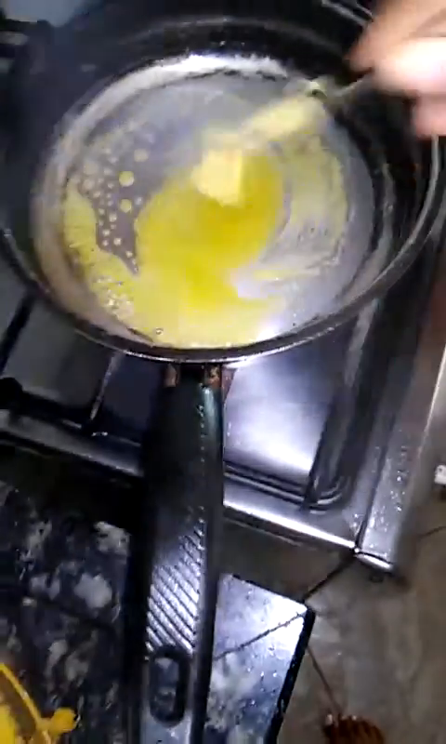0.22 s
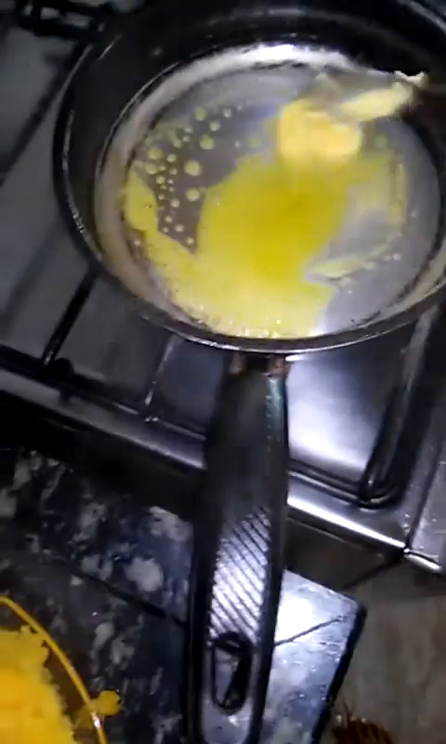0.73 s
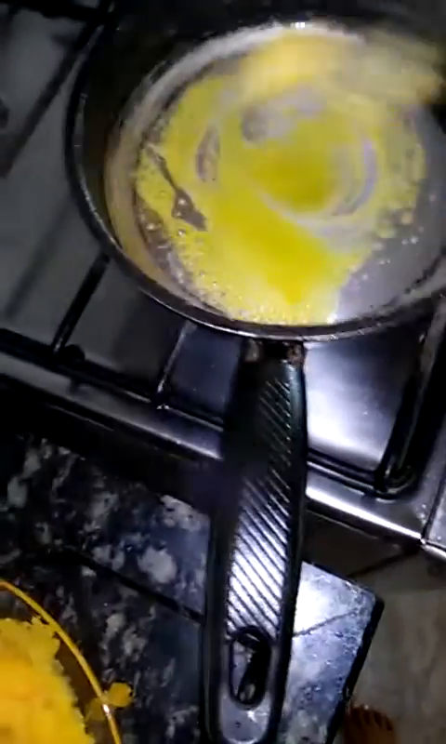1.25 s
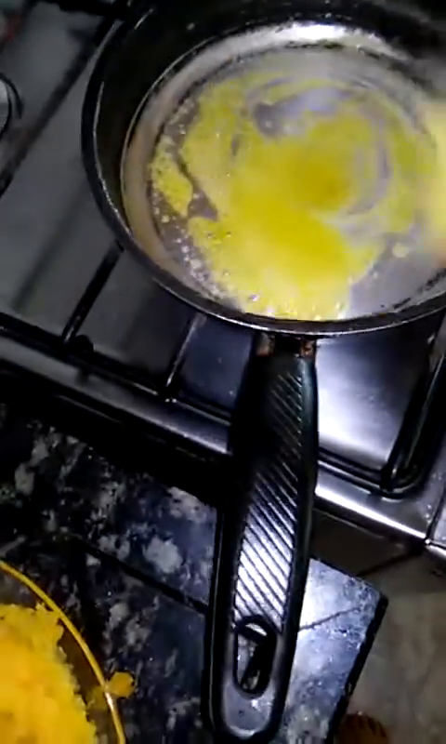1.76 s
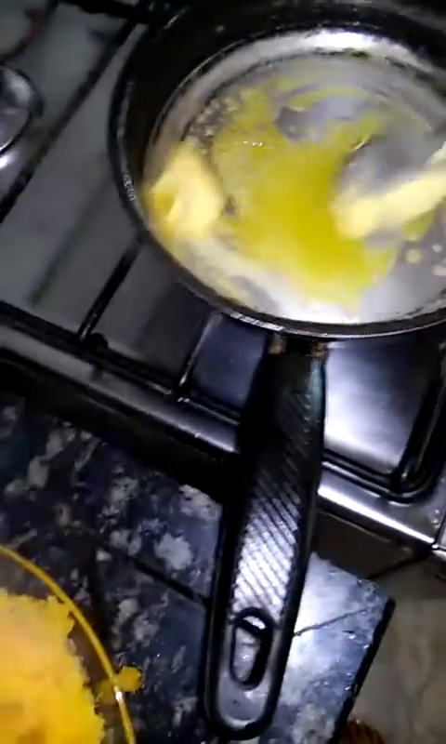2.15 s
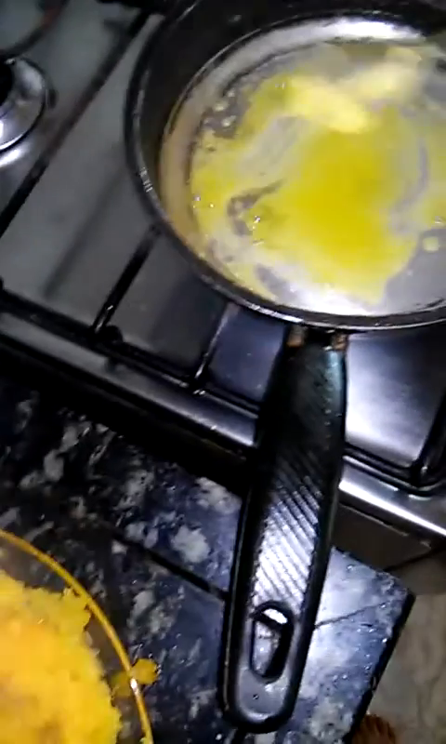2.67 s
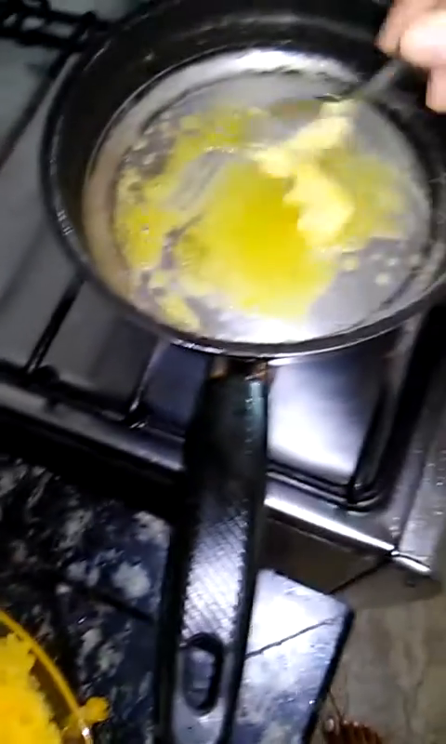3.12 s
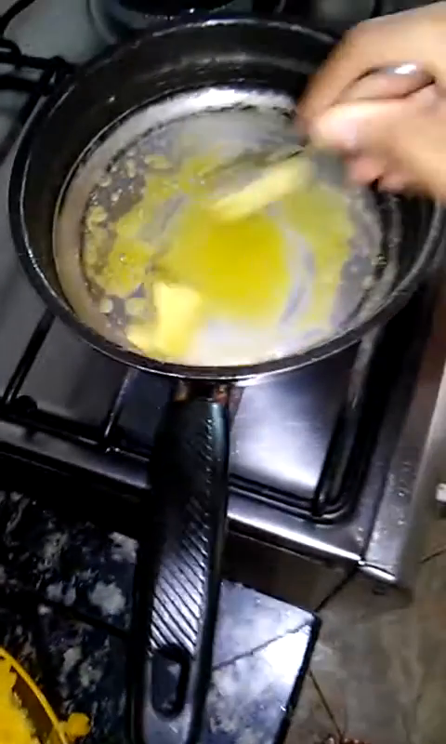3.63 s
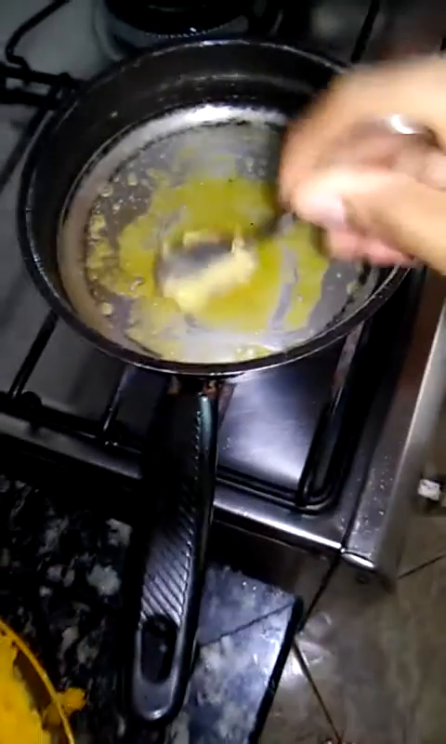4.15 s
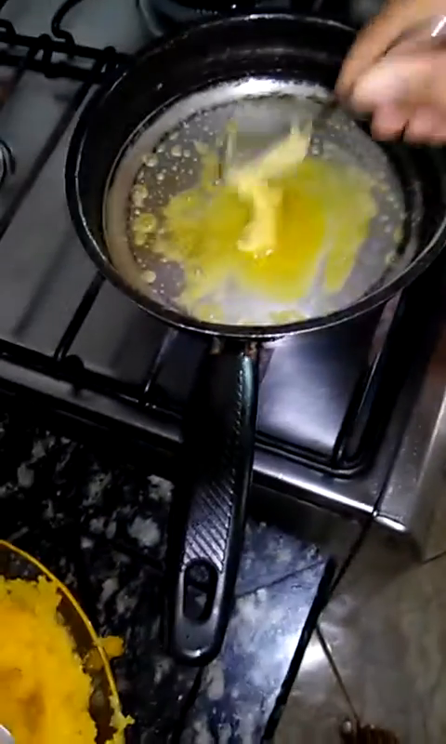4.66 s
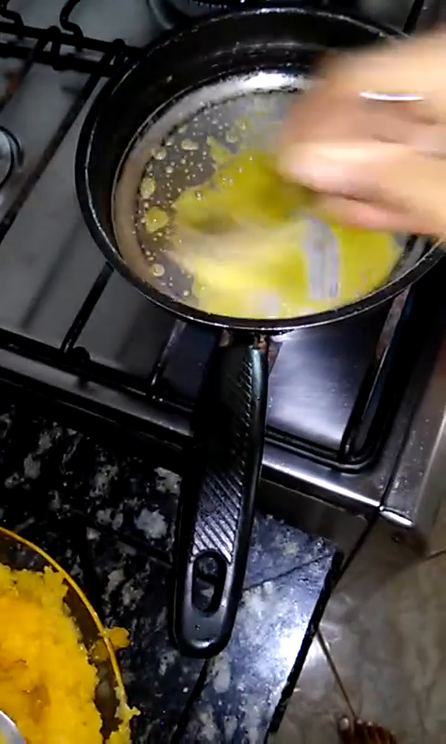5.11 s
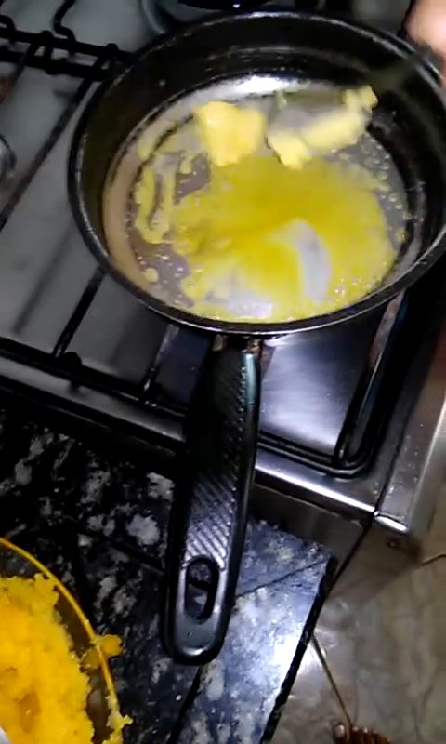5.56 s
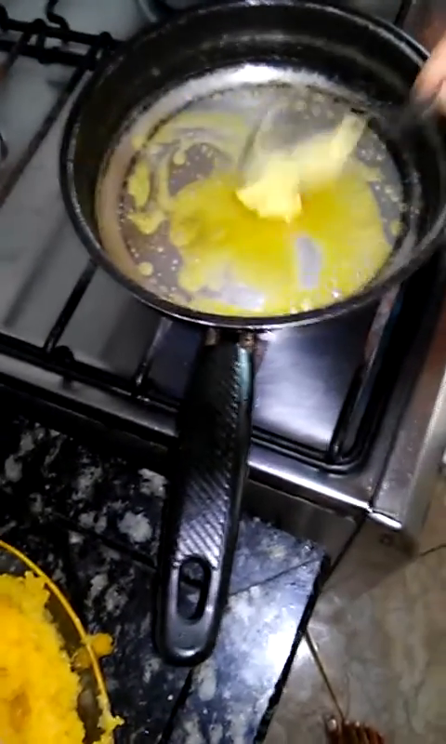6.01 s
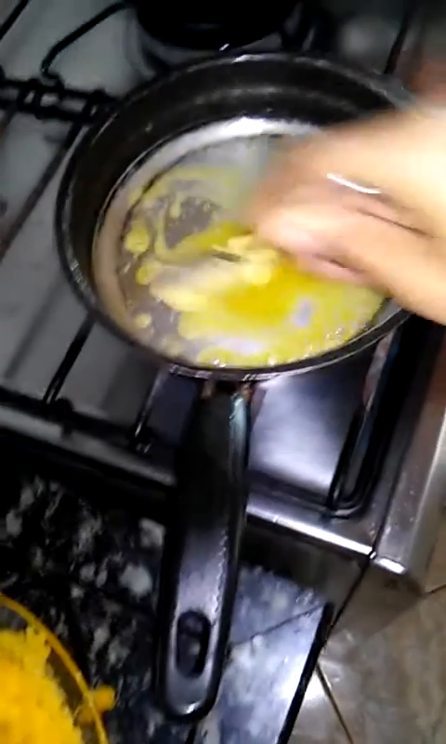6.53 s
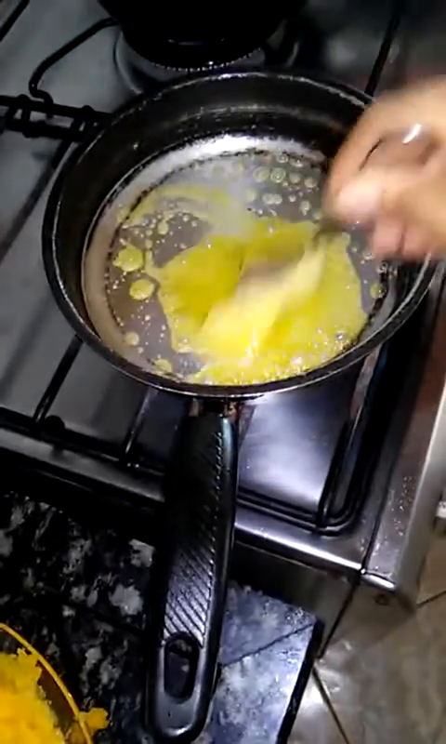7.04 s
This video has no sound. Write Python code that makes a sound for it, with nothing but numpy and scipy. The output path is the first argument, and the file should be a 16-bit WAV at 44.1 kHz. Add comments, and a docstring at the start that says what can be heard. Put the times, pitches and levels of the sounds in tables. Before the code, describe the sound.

A phone close to a small saucepan in a hard-walled kitchen picks up butter sizzling over a gas burner's soft low rumble. From 0 to 1 s the fizz comes in bright, crackling surges with small ticks and light spoon taps. Around 1.0 to 1.2 s it flares strongest, and at 1.2 s the spoon knocks the pan, which rattles briefly on the grate, rings and makes the stove top boom. Ticks at 1.65 and light metal taps near 1.9 s follow. From 2.4 to 4.9 s the sizzle is thin and faint, with clicks at 3.1 and 3.6-3.9 s and a faint thin whistle near 4.4. At 5 s the sizzle swells again, with sharp ticks at 5.15 and a tap at 5.7. Quick ticks lead to the hardest ringing clank at 6.3 s, with a dull thump. A softer rattling knock comes at 6.94, and a final bright tick at 7.26.

```python
"""Butter sizzles in a small saucepan on a gas burner in a hard-walled kitchen, heard by a phone.
Steam bubbles fizz and pop in the hollow of the pan as the spoon pushes butter onto hot metal:
shaped noise and crackle follow the flares, and tone bursts with splashes make short bright ticks.
The spoon taps the pan and three knocks rattle it on the grate, both ringing the modes of the pan.
The stove top booms, shaped noise makes the flame rumble below, and thin whistles come and go."""
import sys
import numpy as np
from scipy import signal
from scipy.fft import rfft, irfft, next_fast_len
from scipy.io import wavfile
from scipy.ndimage import uniform_filter1d

SR = 44100
rng = np.random.default_rng(int(sys.argv[2]) if len(sys.argv) > 2 else 0)


def to_wav(s):
    """Save 16-bit WAV."""
    ch = np.atleast_2d(s).T  # columns
    pcm = np.round(np.clip(ch, -1, 1) * 32767)  # PCM
    wavfile.write(sys.argv[1], SR, pcm.astype(np.int16))


N = 321489
T = np.arange(N) / SR  # time of every sample [s]

# butter meets hot metal and flares up: (start [s], rise [s], fizz level [dB], fizz fade [dB/s],
# then relative to the fizz: big bubbles [dB], middle bubbles [dB], fine spray [dB])
BUTTER_FLARES = [(-.1, 0.12, -31.5, 21.5, -11, -4, -8), (.29, 0.056, -33.5, 28, -21, -10, -12.5),
                 (.55, 0.011, -34, 8.5, -19, -10, -10.5), (1.03, 0.17, -26.5, 33.5, -13, -7, -22),
                 (1.2, 0.1, -25.5, 116, -2.5, -0.5, -14), (1.34, 0.051, -35.5, 26, -9, -2.5, -5),
                 (1.56, 0.091, -36, 24, -14, -9, -16), (1.82, 0.12, -37.5, 18.5, -2.5, 3.5, -7),
                 (2.38, 0.079, -46.5, 44, -8, 2.5, -8), (2.648, 0.084, -46.5, 16, -13, -8.5, -8.5),
                 (3.09, 0.058, -49.5, 26, -9.5, 1.5, -19), (3.279, 0.071, -40, 17.5, -5, 2.5, -7.5),
                 (3.42, 0.24, -39.5, 37, -13, -13.5, -9), (3.9, 0.086, -45, 65, -14, -9, -16),
                 (4.17, 0.078, -53.5, 1.5, -14, -21, -16), (4.907, 0.078, -43.5, 12, -1.5, 10.5, -20),
                 (4.97, 0.18, -31, 11, -10, -1, -14), (5.429, 0.065, -32.5, 34, -11, -16, -14),
                 (5.975, 0.0058, -34.5, 17, -14, -17, -36), (6.294, 0.011, -33.5, 55, 4, 2, -13),
                 (6.45, .05, -45, 29, -6.5, -6, -17), (6.93, 0.013, -35.5, 20, -7.5, -5, -18.5),
                 (7.255, 0.022, -39, 109, -11, -15, -18)]
# how fast each size fades, as a share of the fade of the fizz: fresh butter boils coarse, then settles
BIG_FADE, MIDDLE_FADE, SPRAY_FADE = 1.58, 2.07, 0.9
RISE_POWER = 0.97  # a flare rises almost in a straight line

# spectrum shape of the small bubbles: (frequency [Hz], density [dB per Hz])
FIZZ_SPECTRUM = [(3300, -38.5), (4300, -2.5), (4900, -3.5), (5400, 5), (6100, 4.5), (7000, -2),
                 (9500, -11.5), (12400, -27), (20000, -100)]
# spectrum shape of the middle bubbles: (frequency [Hz], density [dB per Hz])
FROTH_SPECTRUM = [(2900, -63), (3500, -12), (3900, -6), (4500, -1.5), (4900, 2), (5600, -8), (7000, -62.5)]
# spectrum shape of the big bubbles: (frequency [Hz], density [dB per Hz])
GURGLE_SPECTRUM = [(700, -32), (1300, -18), (1500, -9), (2300, -3.5), (3100, -3), (3600, 0), (5000, -50.5)]
# spectrum shape of the finest droplets: (frequency [Hz], density [dB per Hz])
SPRAY_SPECTRUM = [(4710, -22.5), (8000, -4.5), (14900, -22), (16000, -26)]
# resonances of the air in the pan: (frequency [Hz], width [Hz], lift [dB])
PAN_AIR = [(1540, 31, 6), (1860, 490, 2.5), (2173, 160, 7), (2445, 68, 9.5), (2927, 180, 9)]

# short bright ticks, bursting bubbles and the sharp click that starts each knock:
# (time [s], level [dB], pitch [Hz], wide splash relative to that level [dB])
BRIGHT_TICKS = [(0.183, -16.5, 4850, -8), (0.301, -18, 5400, 2), (0.3508, -17, 6000, -0.5),
                (0.556, -14, 4910, -2), (0.704, -13.5, 6030, -12), (0.807, -18, 5800, -1),
                (0.8695, -14.5, 6530, -14), (1.2014, -5, 6200, -4), (1.468, -22, 5500, -10),
                (1.6412, -11, 6380, -12.5), (1.6661, -14, 5640, -8), (1.8536, -27, 5430, 5),
                (1.8822, -20.5, 6100, -3), (2.6666, -28.5, 6300, -10), (3.1124, -18.5, 5370, -24),
                (3.112, -12.5, 4830, -21), (3.802, -24.5, 7000, -11), (3.92, -17, 6340, -14),
                (4.1974, -31.5, 5200, -6.5), (4.234, -26.5, 7000, -25), (4.496, -32.5, 6000, -7),
                (4.632, -32.5, 6310, -13), (4.5737, -29.5, 5700, -16), (4.763, -40.5, 5860, -1.5),
                (5.0245, -19.5, 4570, -5), (5.1512, -8, 5050, -31), (5.1828, -7, 4840, -27),
                (5.447, -15, 4660, 2), (5.4922, -10, 5400, -8), (5.888, -19, 5230, -8),
                (5.9847, -16, 5670, -2), (6.0715, -14, 6760, -13.5), (6.1569, -12.5, 6470, -10),
                (6.1913, -11.5, 5890, -11), (6.2994, -3.5, 5280, -6.5), (6.347, -13.5, 5900, -14),
                (6.4124, -12.5, 5080, -11), (6.5287, -17, 5800, -21), (6.5804, -26.5, 5500, -5),
                (6.6905, -22.5, 5400, -8), (6.9104, -21, 5400, -19), (6.9404, -13, 4380, -7),
                (7.264, -6, 5240, -16)]
# spectrum shape of splash and spatter: (frequency [Hz], density [dB per Hz])
SPLASH_SPECTRUM = [(1500, -34.5), (2500, -10.5), (3500, -18.5), (5000, 4.5), (6500, 2), (9500, -21.5),
                   (14000, -56.5)]

# spoon on pan: (time [s], dry peak [dB], brightness [dB/octave], narrowness [dB/octave squared])
SPOON_TAPS = [(0.3511, -25, 30, 9), (0.5555, -26, 35, 16), (0.7077, -32.5, 2, 26), (0.886, -38, -4, 30),
              (0.912, -37, 18, 18), (1.009, -32.5, 11, 17), (1.2009, -9.5, 6, 4), (1.6737, -37.5, -16, 19),
              (1.8786, -23.5, 25, 5), (1.9359, -21, 11.5, 13), (3.634, -26, 37, 31),
              (5.7062, -28.5, 12, 13), (5.9858, -30, 31, 5), (6.3, -6, 10, 20), (6.9386, -17.5, 1, 12)]
# ringing modes of the pan: (frequency [Hz], undamped width [Hz], level [dB])
PAN_MODES = [(348, 10.4, -15.5), (381, 42, -5.5), (794, 53, -5), (814, 13.5, -10), (894, 21.6, -4.5),
             (996, 36, -9), (1295, 33, -6), (1351, 52, -0.5), (1486, 44, 3), (1562, 15.3, -5),
             (1627, 18, -5.5), (1758, 25, -6), (1995, 45, -2), (2044, 34, -2.5), (2196, 51, 5),
             (2410, 34, -14), (2593, 97, -11), (2646, 71, 4), (2957, 177, 10), (3335, 76, 2.5),
             (3093, 37, -7), (3740, 190, 8.5), (4220, 54, 2.5), (5280, 180, -0.5), (5900, 300, -23),
             (7000, 570, -50.5)]
# knocks that set the pan chattering on the grate: (time [s], blow [dB], chatter [dB],
# chatter slope [dB/s], chatter length [s], rocking depth [dB])
GRATE_KNOCKS = [(1.198, -20, -28, 45, 0.12, 1.5), (6.301, -13.5, -22, -87, .09, 4),
                (6.939, -28, -26, 38, 0.072, 1.5)]
# which modes each knock reaches, by where the pan was struck; per knock: (frequency [Hz], reach [dB])
KNOCK_REACH = [
    [(330, 0), (800, -32.5), (960, 0), (1590, -5.5), (2150, -6.5), (3300, 0), (6000, -9)],
    [(330, -7), (800, -12), (1320, -3.5), (1600, -19), (2040, -4), (3000, -9), (6000, -16)],
    [(330, -9), (800, -5.5), (930, -9), (1570, -3), (2100, -7), (3000, -11), (6000, -13)],
]
GRATE_DAMPING = 1.38  # times the mode widths, while the pan bumps on the grate and after
BLOW_FADE_DB_PER_S, ROCKS_PER_S = 1301, 24.3
SETTLE_DB, SETTLE_FADE_DB_PER_S, SETTLE_S = -10, 73, .09  # fainter contacts as the pan comes to rest

# the stove top booms: (time [s], level before the swell [dB], t60 [s])
STOVE_THUMPS = [(0.723, -31, 0.22), (1.288, -15.5, 0.12), (1.688, -40, 0.7), (6.333, -16.5, 0.14)]
# spectrum shape of the flame and the kitchen hum: (frequency [Hz], density [dB per Hz])
FLAME_SPECTRUM = [(12, -31.5), (20, 2), (65, -6), (85, -4.5), (125, 2), (145, -8.5), (171, 2.5), (191, -8),
                  (256, -22.5), (325, -13.5), (435, -22), (584, -24), (842, -29.5), (1030, -22),
                  (1600, -44), (2080, -25), (3520, -120)]
# slow course of the low rumble, as the phone picks it up: (time [s], level [dB])
RUMBLE_COURSE = [(0.0, -53.5), (0.65, -52.5), (1.3, -50), (1.97, -52.5), (2.6, -62), (2.98, -63),
                 (3.57, -55), (4.2, -60), (4.81, -60.5), (5.28, -47.5), (5.64, -52.5), (6.46, -48),
                 (6.85, -60), (7.13, -47), (7.29, -59)]
# thin whistles, a list of points for each: (time [s], mean pitch [Hz], level [dB])
WHISTLE_GLIDES = [
    [(.13, 2520, -60), (.17, 2515, -50), (.28, 2470, -51), (.31, 2450, -60)],
    [(4.315, 2430, -59), (4.355, 2440, -56), (4.47, 2490, -57.5), (4.6, 2410, -59), (4.77, 2270, -68)],
    [(6.52, 2590, -60), (6.62, 2550, -57), (6.7, 2440, -61), (6.77, 2280, -66)],
]
# decay of the room: (frequency [Hz], t60 [s])
KITCHEN_DECAY = [(100, 1), (400, 0.22), (1000, 0.89), (2500, 0.49), (6000, 0.069), (12000, 0.79)]
EDGE_HZ = 15750  # upper edge of the band


def gain_of(db):
    """Turns decibels into gain."""
    return 10 ** (np.asarray(db) / 20)


def evened(x):
    """Scales a sound to rms 1."""
    return x / np.sqrt(np.mean(x ** 2) + 1e-20)


def read(points, hz):
    """Reads a frequency table on a log-frequency axis."""
    f, value = np.transpose(points)
    return np.interp(np.log(hz + 1), np.log(f + 1), value)


def curve(rows, axis):
    """Draws one column of a table as a line through every sample."""
    rows = np.array(rows)
    return np.interp(T, rows[:, 0], rows[:, axis])


def add(mix, s, sound):
    """Mixes a sound in at time s."""
    part = mix[round(s * SR):][:len(sound)]
    part += sound[:len(part)]


def colour(x, points):
    """Filters x by a spectrum table and evens it to rms 1."""
    size = next_fast_len(len(x))
    hz = np.fft.rfftfreq(size, 1 / SR)
    spectrum = rfft(x, size) * gain_of(read(points, hz))
    return evened(irfft(spectrum, size)[:len(x)])


def crackle(per_s, spread_db, hiss):
    """Sparse clicks of very unequal size over a share of smooth hiss."""
    size = gain_of(spread_db * np.minimum(rng.exponential(1, N), 5))
    sign = rng.choice([-1., 1.], N)
    clicks = size * sign * (rng.random(N) < per_s / SR)
    return evened(clicks) + hiss * rng.standard_normal(N)


def flutter(span_s, depth_db):
    """A randomly wavering gain: noise smoothed twice, with an rms depth in dB."""
    size = max(round(span_s * SR), 1)
    smooth = uniform_filter1d(rng.standard_normal(N), size)
    smooth = uniform_filter1d(smooth, size)
    return gain_of(depth_db * evened(smooth))


def sizzle():
    """Four sizes of steam bubble, each coloured crackle, follow the flares."""
    small, big, middle, finest = flares() * flutter(span_s=0.057, depth_db=0.7)
    fizz = colour(crackle(per_s=3000, spread_db=4.5, hiss=1.0), FIZZ_SPECTRUM)
    fizz *= flutter(span_s=0.0043, depth_db=2.0)
    fizz += gain_of(-7.5) * spits(per_s=180, spread_db=6.5)
    froth = colour(crackle(per_s=2200, spread_db=4.5, hiss=0.9), FROTH_SPECTRUM)
    gurgle = hollow(colour(crackle(per_s=1500, spread_db=4.0, hiss=1.0), GURGLE_SPECTRUM))
    gurgle *= flutter(span_s=0.02, depth_db=1.5)
    spray = colour(crackle(per_s=4800, spread_db=7.0, hiss=1.0), SPRAY_SPECTRUM)
    spray *= flutter(span_s=0.022, depth_db=1.5)
    return small * fizz + middle * froth + big * gurgle + finest * spray


def flares():
    """Gains of the fizz, big, middle and finest bubbles: each flare swells, then fades."""
    power = np.zeros((4, N))
    for s, rise_s, db, fade_db, big_db, middle_db, spray_db in BUTTER_FLARES:
        at = max(round(s * SR), 0)
        t = T[at:] - s
        swell = np.clip(t / rise_s, 0, 1) ** RISE_POWER
        fizz_faded_db = abs(fade_db) * np.maximum(t - rise_s, 0)
        faded_db = np.outer([1, BIG_FADE, MIDDLE_FADE, SPRAY_FADE], fizz_faded_db)
        level_db = db + np.array([[0], [big_db], [middle_db], [spray_db]])
        power[:, at:] += (swell * gain_of(level_db - faded_db)) ** 2  # overlapping flares add in power
    return np.sqrt(power)


def spits(per_s, spread_db):
    """Many small bubbles of chance pitch and size, each a few cycles that swell and die."""
    size = gain_of(spread_db * np.minimum(rng.exponential(1, N), 3))
    size = size * (rng.random(N) < per_s / SR)
    kind, t = rng.integers(0, 12, N), T[:400]
    pitches = np.linspace(4700, 7200, 12)
    swells_s = np.tile([0.0004, 0.0007, 0.0013], 4)
    out = np.zeros(N)
    for k, (hz, s) in enumerate(zip(pitches, swells_s)):
        swell = (t / s * np.exp(1 - t / s)) ** 2
        grain = swell * np.sin(2 * np.pi * hz * t) / np.sqrt(s)
        out += signal.oaconvolve(size * (kind == k), grain)[:N]
    return evened(out)


def hollow(x):
    """The air in the pan resonates and lifts a few bands."""
    hz = np.fft.rfftfreq(len(x), 1 / SR)
    lift_db = sum(db / (1 + (2 * (hz - f) / width) ** 2) for f, width, db in PAN_AIR)
    return evened(irfft(rfft(x) * gain_of(lift_db), len(x)))


def bright_ticks():
    """Bursting bubbles and knock clicks: a few cycles that swell and die, a wide splash and a spatter."""
    out, t = np.zeros(N), T[:1500]
    swell = t / 0.0011 * np.exp(1 - t / 0.00064)
    splashes = colour(rng.standard_normal(N), SPLASH_SPECTRUM)
    for (s, db, hz, splash_db), phase in zip(BRIGHT_TICKS, rng.random(len(BRIGHT_TICKS))):
        splash = splashes[round(s * SR):][:len(t)]
        add(out, s, gain_of(db) * swell * np.sin(2 * np.pi * (hz * t + phase)))
        add(out, s, gain_of(db + splash_db) * splash * np.sqrt(swell[:len(splash)]))
    spatter = colour(rng.standard_normal(3000), SPLASH_SPECTRUM)
    spatter *= gain_of(-60 * T[:3000] / 0.059)  # t60 of 59 ms
    return out + gain_of(-11) * signal.oaconvolve(out, spatter / np.linalg.norm(spatter))[:N]


def taps():
    """Each touch of the spoon, a tick and random ticks within milliseconds, rings the pan."""
    out = np.zeros(N)
    octave = np.log2(np.array(PAN_MODES)[:, 0] / 2000)
    chances = rng.standard_normal((len(SPOON_TAPS), 160))
    for (s, db, tilt_db, narrow_db), chance in zip(SPOON_TAPS, chances):
        drive = np.zeros(8000)
        drive[:160] = 0.035 * chance * np.exp(-T[:160] / 0.00043)
        drive[0] = 1
        drive = np.convolve(drive, np.hanning(6))  # a contact lasts about a tenth of a millisecond
        reach_db = tilt_db * octave - narrow_db * octave ** 2
        # the spoon pressing on the pan damps the modes: a dry crack on top of the ring
        crack = gain_of(4.5) * ring(drive, reach_db, damping=1.9)
        sound = ring(drive, reach_db) + crack
        add(out, s, gain_of(db) * sound / abs(sound).max())
    return out


def rattles():
    """A blow, then fast uneven contacts while the pan rocks and settles; it rings on when they stop."""
    out, t = np.zeros(N), T[:SR // 2]
    contacts = crackle(per_s=1200, spread_db=2.5, hiss=.7)
    for (s, blow_db, chatter_db, slope_db, lasts_s, rock_db), reach in zip(GRATE_KNOCKS, KNOCK_REACH):
        rocking_db = rock_db * np.cos(2 * np.pi * ROCKS_PER_S * t)
        rocking_db += chatter_db + slope_db * np.minimum(t, lasts_s)
        settling_db = np.where(t > lasts_s, SETTLE_DB - SETTLE_FADE_DB_PER_S * (t - lasts_s), 0)
        blow = gain_of(blow_db - BLOW_FADE_DB_PER_S * t)
        chatter = gain_of(rocking_db + settling_db) * (t < lasts_s + SETTLE_S)
        force = blow + chatter
        bumps = contacts[round(s * SR):][:len(t)]
        reach_db = read(reach, np.array(PAN_MODES)[:, 0])
        # levels are relative to the ring under steady contacts
        steady = np.std(ring(bumps, reach_db, damping=GRATE_DAMPING))
        add(out, s, ring(force[:len(bumps)] * bumps, reach_db, damping=GRATE_DAMPING) / steady)
    return out


def ring(drive, reach_db, damping=1):
    """The modes of the pan resonate, each driven as strongly as the contact reaches it."""
    out = np.zeros(len(drive))
    for (hz, width_hz, db), more_db in zip(PAN_MODES, reach_db):
        r, w = np.exp(-np.pi * width_hz * damping / SR), 2 * np.pi * hz / SR
        mode = signal.lfilter([np.sin(w)], [1, -2 * r * np.cos(w), r ** 2], drive)
        # a wider second resonance: the mode takes a moment to build up and the gaps between modes stay dark
        soft = r ** 4
        edge = (1 - soft ** 2) / 2
        mode = signal.lfilter([edge, 0, -edge], [1, -2 * soft * np.cos(w), soft ** 2], mode)
        out += gain_of(db + more_db) * mode
    return out


def thumps():
    """The stove top booms: a low panel mode that swells and dies."""
    out, t = np.zeros(N), T[:SR // 2]
    for s, db, t60 in STOVE_THUMPS:
        swell = 1 - np.exp(-t / 0.032)
        add(out, s, gain_of(db - 60 * t / t60) * swell * np.sin(2 * np.pi * 92 * t))
    return out


def flame():
    """Lumpy low roar of burning gas and the hum of the kitchen: shaped noise on the rumble course."""
    lumps = flutter(span_s=0.05, depth_db=1.2)
    roar = colour(rng.standard_normal(N), FLAME_SPECTRUM)
    return gain_of(curve(RUMBLE_COURSE, axis=1)) * roar * lumps


def whistles():
    """A gliding, slightly wavering tone, perhaps steam through a small gap."""
    out = np.zeros(N)
    for rows in WHISTLE_GLIDES:
        s, hz, db = np.transpose(rows)
        t = np.arange(s[0], s[-1], 1 / SR)
        waver = 1 + .2 * uniform_filter1d(rng.standard_normal(len(t)), 400)
        cycles = np.cumsum(np.interp(t, s, hz) * waver) / SR
        tone = np.sqrt(2) * np.sin(2 * np.pi * cycles)
        tone *= flutter(span_s=0.0069, depth_db=3.0)[:len(t)]
        add(out, s[0], gain_of(np.interp(t, s, db)) * tone * signal.windows.tukey(len(t), .2))
    return out


def kitchen(x):
    """Hard walls send back sparse echoes of random sign, each band dying at its own speed."""
    echoes = np.zeros(SR)
    at = np.arange(300, SR - 20, 20)  # one echo at a chance place in every 20 samples
    echoes[at + rng.integers(0, 20, len(at))] = rng.choice([-1., 1.], len(at))
    hz, t, z = signal.stft(echoes, SR, nperseg=256)
    decay = gain_of(-60 * t / read(KITCHEN_DECAY, hz)[:, None])
    tail = signal.istft(z * decay, SR, nperseg=256)[1]
    return signal.fftconvolve(x, tail / np.linalg.norm(tail))[:N]


def scene():
    """Metal sounds fill the room; the sizzle and the bright ticks are close and drier."""
    metal = taps() + rattles()
    close = sizzle() + bright_ticks()
    room = kitchen(gain_of(-5.5) * metal + gain_of(-11.5) * close)
    return (metal + close + room + thumps() + flame() + whistles())[None]


def record(dry):
    """The input rounds off peaks near 0.97 of full scale; then a low-pass limits the band."""
    squeezed = dry / (1 + (dry / .97) ** 4) ** .25
    lowpass = signal.firwin(511, EDGE_HZ, window=("kaiser", 9), fs=SR)
    return signal.oaconvolve(squeezed, lowpass[None], "same")


dry = scene()
out = record(dry)
to_wav(out)
```